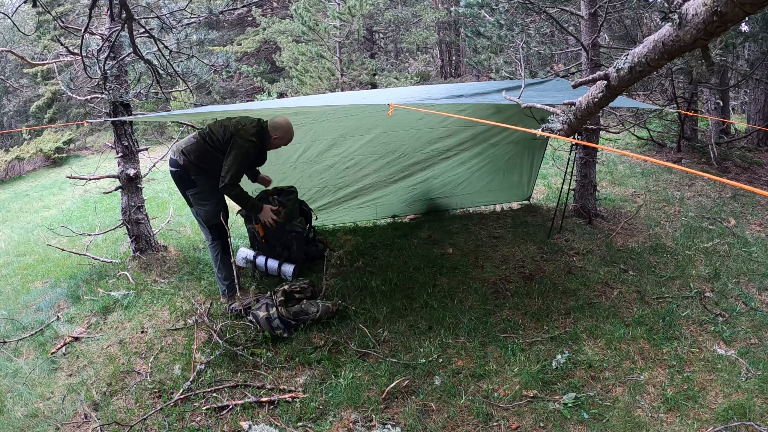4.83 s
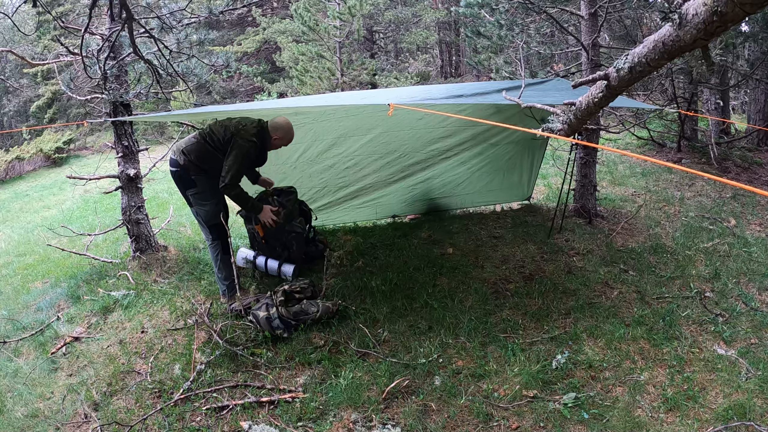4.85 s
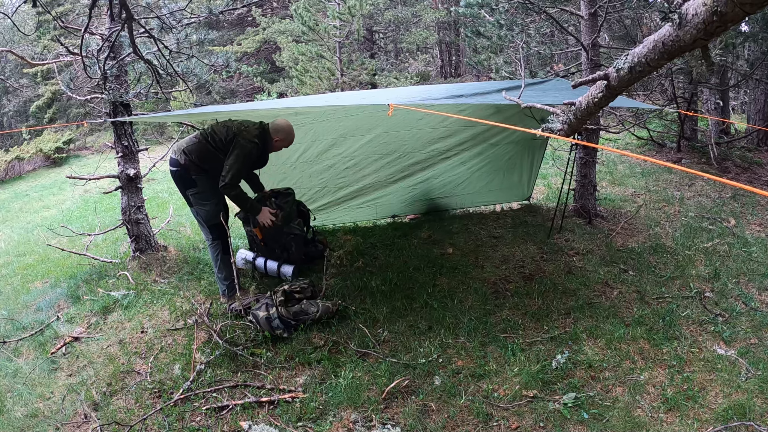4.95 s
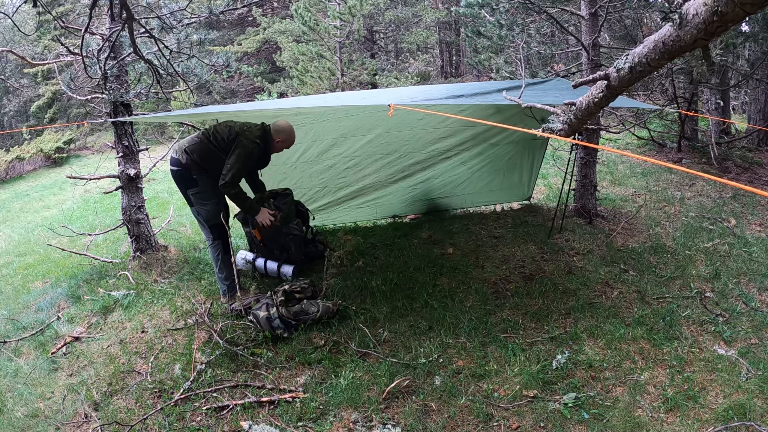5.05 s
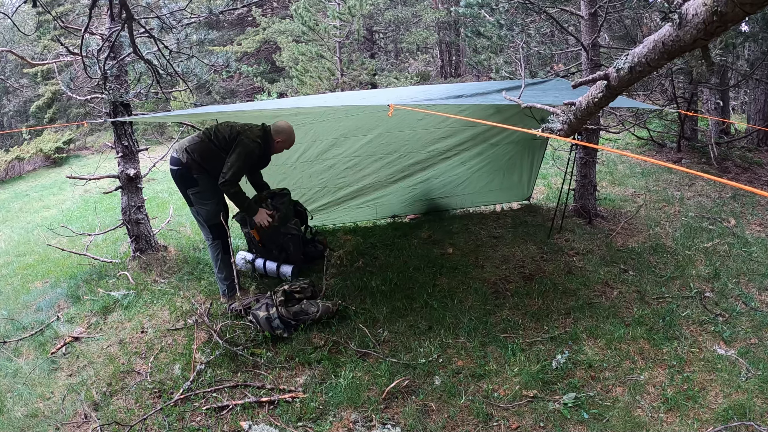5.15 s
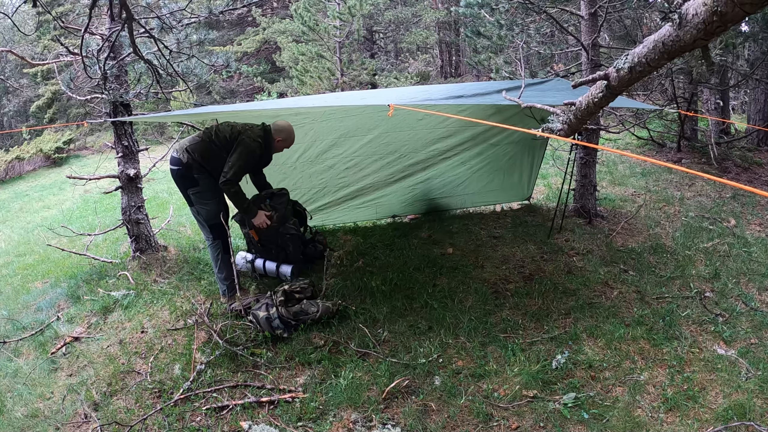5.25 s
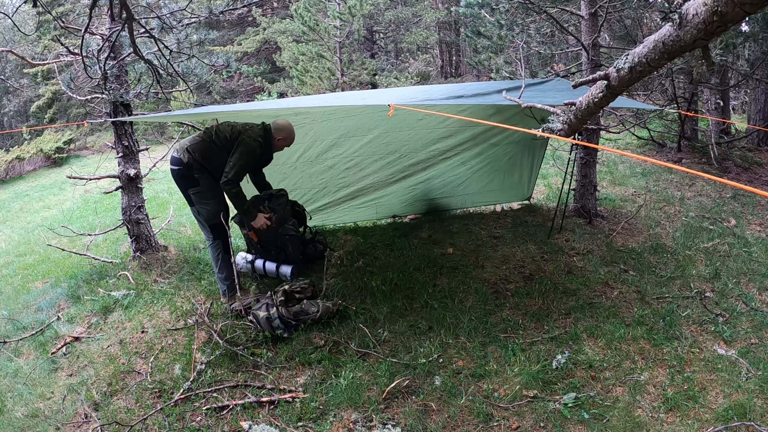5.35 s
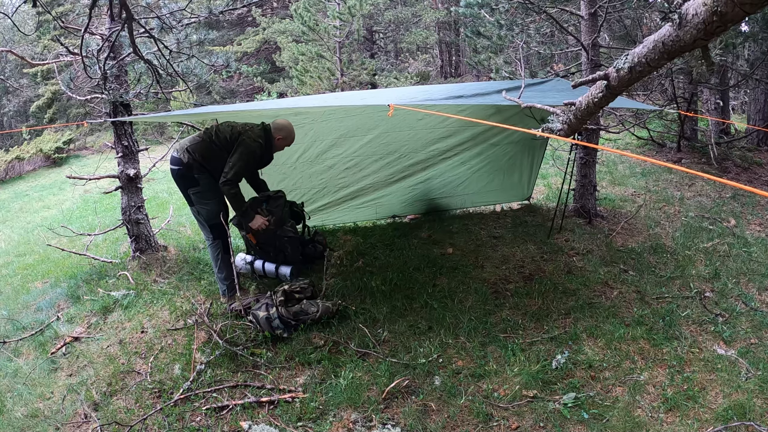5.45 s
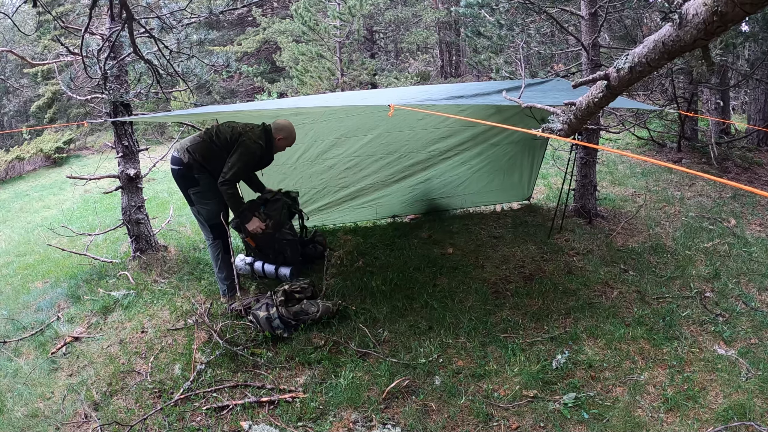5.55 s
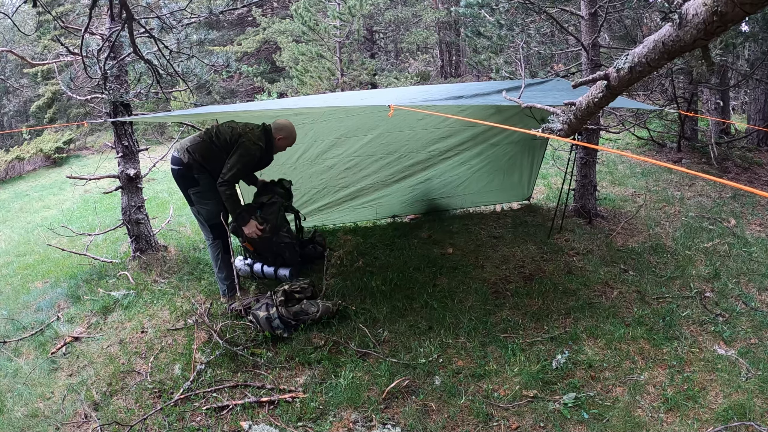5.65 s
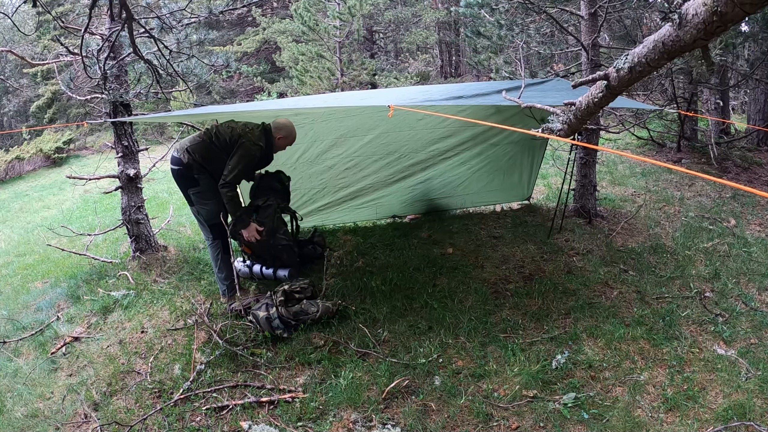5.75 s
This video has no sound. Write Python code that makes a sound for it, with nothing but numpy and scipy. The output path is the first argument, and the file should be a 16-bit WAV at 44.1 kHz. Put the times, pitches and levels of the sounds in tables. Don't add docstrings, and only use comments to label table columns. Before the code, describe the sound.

A hammer strikes a stake into soft forest ground about three times a second while a pack's nylon rustles and buckles tick close by.

```python
import sys
import numpy as np
from scipy import signal
from scipy.fft import rfft, irfft
from scipy.io import wavfile
from scipy.ndimage import uniform_filter1d

SR = 44100
rng = np.random.default_rng(int(sys.argv[2]) if len(sys.argv) > 2 else 0)


def boost(x):
    u = np.asarray(x, float) / 20
    return 10 ** u


def unload_audio(sound):
    columns = np.transpose(np.atleast_2d(sound))
    steps = np.round(np.clip(columns, -1, 1) * 32767)
    wavfile.write(sys.argv[1], SR, steps.astype(np.int16))


N = 255780

# t/s, peak level/dB, strongest ring f/Hz, bending ring f/Hz, squareness of the landing/0-1
BLOW_TABLE = [(0.7975, -11, 3930, 1370, 0.78), (1.1323, -8.5, 3840, 1870, .05),
              (1.4514, -8, 3880, 1780, 0.95), (1.795, -7, 4720, 1440, 0.96),
              (2.145, -9.5, 3740, 1425, 0.91), (2.4925, -6, 4040, 1490, 0.92),
              (2.843, -3, 5070, 1540, 0.27), (3.3154, -6, 3790, 1260, 0.84), (3.7104, -4, 4260, 1870, 0.85),
              (4.0869, -5.5, 3900, 1690, 0.9), (4.4482, -7, 3860, 1390, 0.98),
              (4.8072, -4.5, 3650, 1820, 1), (5.171, -5, 4110, 1530, 0.17), (5.5301, -7, 4050, 1780, .2)]
# chatter length/ms, middle ring f/Hz, bright rings level/dB, thump level/dB, scatter level/dB
LANDING_TABLE = [(7.5, 2580, -48, -43.5, -9.5), (2.1, 2760, -24, -36, -7.5), (6, 3030, -26, -40, -5),
                 (2.1, 2870, -31, -39, -4.5), (5.4, 2800, -71, -38, -5), (4.5, 2900, -24, -33.5, -4),
                 (1.2, 3400, -22, -33.5, -4.5), (5.3, 2430, -20, -29, -5), (2.8, 2540, -9.5, -31, -4.5),
                 (1.8, 2830, -20, -29, -8), (4.4, 2820, -23, -25.5, -7), (2.8, 2790, -17, -29, -3.5),
                 (2.5, 2170, -15.5, -31.5, -8.5), (7.1, 3000, -19, -34.5, -5.5)]


def evened(x):
    return x / np.sqrt(np.mean(x ** 2) + 1e-20)


def peaked(x):
    return x / (abs(x).max() + 1e-12)


def read(points, hz):
    f, value = np.transpose(points)
    return np.interp(np.log(hz + 1), np.log(f + 1), value)


def add(mix, s, sound):
    part = mix[round(s * SR):][:len(sound)]
    part += sound[:len(part)]


def span(s):
    return s[0] + np.arange(int((s[-1] - s[0]) * SR)) / SR


def resonate(x, hz, width):
    turn = np.exp(2j * np.pi * np.cumsum(hz * np.ones(len(x))) / SR)
    r = np.exp(-np.pi * width / SR)
    return 2 * (turn * signal.lfilter([1 - r], [1, -r], x / turn)).real


def ring(x, hz, width):
    return resonate(resonate(x, hz, width), hz, width)


def swells(rows, t):
    return sum(db * np.exp(-((t - middle) / half) ** 2) for middle, half, db in rows)


def field_axes():
    return np.fft.rfftfreq(512, 1 / SR), np.arange(N // 128 + 5) * 128 / SR


def pair(shape_db, same):
    a, b, c, d = rng.standard_normal((shape_db.shape[1], shape_db.shape[0], 4)).T
    left = a + 1j * b
    right = same * left + np.sqrt(1 - same ** 2) * (c + 1j * d)
    z = np.array([left, right]) * boost(shape_db)
    return signal.istft(z, nperseg=512, noverlap=384)[1][:, :N]


def handling(t):
    # t/s, rustle level/dB
    hands = [(0.0, -47), (0.05, -45), (0.14, -48.5), (0.48, -53.5), (0.68, -54.5), (0.9, -54), (1.0, -51),
             (1.21, -56), (2.03, -56.5), (2.63, -56), (2.73, -53.5), (3.58, -55), (3.81, -57.5),
             (4.13, -55), (4.31, -55.5), (4.59, -56), (5.32, -54), (5.8, -51.5)]
    s, busy_db = np.transpose(hands)
    return np.interp(t, s, busy_db - np.median(busy_db))


def cloth():
    # f/Hz, level per Hz/dB
    air = [(15, -38), (25, 2), (97, -12), (131, -18), (172, -6), (258, -15), (295, -11), (481, -14),
           (582, -18), (898, -19), (1180, -12), (2380, -11.5), (6870, -20.5), (13200, -47), (16400, -61)]
    # f/Hz, width/Hz, level/dB
    pack = [(70, 17, -2), (134, 54, 6.5), (243, 17, 6), (1100, 750, 6.5)]
    # f/Hz, likeness/0-1
    likeness = [(60, 1), (180, 0.87), (550, 0.93), (1650, 0.94), (4970, 0.98), (15000, 0.32)]
    follow = [.3, .7, 1.05, 1.1]
    # middle t/s, half length/s, lift/dB
    drags = [
        (.1, 0.059, 7),
        (0.705, 0.069, 10.5),
        (3.55, 0.36, 3.5),
        (4.313, 0.13, 4),
        (4.88, 0.06, 9),
    ]
    # middle t/s, half length/s, lift/dB
    brushes = [
        (.12, 0.043, 2.5),
        (.4, 0.051, 3.5),
        (3.09, 0.034, 2.5),
        (4.37, 0.062, 7),
        (5.05, .05, 3),
    ]
    hz, t = field_axes()
    moves = np.outer(follow, handling(t))
    moves[1] += swells(drags, t)
    moves[3] += swells(brushes, t)
    centres = np.log([40, 250, 1400, 5000])
    weights = np.array([np.interp(np.log(hz + 1), centres, row) for row in np.eye(4)])
    weights[-1] *= 1 + .45 * hz / 12000
    patches = uniform_filter1d(rng.standard_normal((len(t), len(hz))), 12, 0)
    patches = evened(uniform_filter1d(patches, 6, 1)).T
    crinkle = np.minimum(rng.exponential(1, len(t)), 5) - 1
    field_db = weights.T @ moves + 1.7 * patches + 1.3 * crinkle
    same = np.clip(read(likeness, hz) - .04, -1, 1)[:, None]
    fine_hz = np.fft.rfftfreq(N, 1 / SR)
    hollow_db = sum(db / (1 + (2 * (fine_hz - f) / width) ** 2) for f, width, db in pack)
    noise = irfft(rfft(pair(field_db, same)) * boost(read(air, fine_hz) + hollow_db), N)
    return boost(-51.5) * noise / np.median(abs(noise)) * 0.61


def slides():
    slide_table = [
        (0.13, 0.12, -50, 230),
        (3.557, 0.13, -54, 287),
    ]
    t, noise = np.arange(N) / SR, rng.standard_normal(N)
    out = np.zeros(N)
    for middle, half, db, hz in slide_table:
        out += boost(db) * np.exp(-((t - middle) / half) ** 2) * evened(ring(noise, hz, 140))
    return out


def crinkles():
    # t/s, peak level/dB
    creases = [(0.011, -40.5), (.213, -45), (.41, -71), (1.0408, -54), (1.0996, -45), (1.1804, -42),
               (1.278, -47), (1.306, -56), (1.3557, -50), (1.6662, -52.5), (2.7674, -43), (3.0862, -50),
               (3.668, -38.5), (3.909, -44.5), (3.918, -52), (3.928, -52), (4.624, -50), (4.7338, -55),
               (4.78, -55), (4.8753, -45), (5.0103, -57), (5.252, -42), (5.4338, -45.5), (5.618, -39.5)]
    per_s, floor_db, spread_db = 30, -57, 3
    busy = boost(handling(np.arange(N) / SR))
    size = boost(floor_db + spread_db * np.minimum(rng.exponential(1, N), 2)) * busy
    train = size * (rng.random(N) < per_s * busy / SR)
    for s, db in creases:
        add(train, s, boost(np.array([db + 8])))
    decay = np.exp(-np.arange(300) * 1e3 / SR / 2.08)
    burst = signal.oaconvolve(train, decay)[:N] * rng.standard_normal(N)
    snaps = ring(burst, 2800, 5100) + 0.16 * ring(burst, 6900, 4000)
    return signal.sosfilt(signal.butter(3, 7500, fs=SR, output="sos"), snaps)


def groan():
    # t/s, level/dB, upper groan f/Hz
    groan_curve = [(4.311, -56, 425), (4.335, -54, 367), (4.355, -46, 390), (4.375, -55, 450),
                   (4.39, -48, 330), (4.41, -47, 463), (4.432, -54, 450)]
    s, db, hz = np.transpose(groan_curve)
    t = span(s)
    noise = rng.standard_normal(len(t))
    judder = evened(resonate(noise, np.interp(t, s, hz), 110)) + 1.35 * evened(resonate(noise, 172, 110))
    out = np.zeros(N)
    add(out, s[0], boost(np.interp(t, s, db)) * judder)
    return out


def webbing():
    # t/s, upper whistle f/Hz, level/dB
    whistle_curve = [(0.95, 2180, -70.5), (0.966, 2007, -56), (0.996, 2250, -56), (1.018, 2140, -55),
                     (1.127, 2230, -52)]
    s, hz, db = np.transpose(whistle_curve)
    t = span(s)
    noise = rng.standard_normal(len(t))
    lower_hz = np.interp(t, s[[0, -1]], [1050, 870])
    whistle = evened(resonate(noise, np.interp(t, s, hz), 110))
    whistle += boost(-1) * evened(resonate(noise, lower_hz, 150))
    out = np.zeros(N)
    add(out, s[0], boost(np.interp(t, s, db)) * whistle * signal.windows.tukey(len(t), .2))
    return out


def squeaks():
    # t/s, slip rate f/Hz, level/dB
    slips = [
        [(4.215, 350, -62), (4.237, 400, -54), (4.252, 520, -48), (4.264, 620, -52), (4.275, 640, -64),
         (4.29, 610, -55), (4.305, 580, -62)],
        [(4.308, 740, -58), (4.33, 900, -50), (4.348, 1000, -50), (4.36, 1230, -40), (4.371, 1160, -45),
         (4.383, 1260, -40), (4.395, 1080, -42), (4.405, 880, -42), (4.412, 860, -55)],
    ]
    out = np.zeros(N)
    for rows in slips:
        s, hz, db = np.transpose(rows)
        t = span(s)
        waver = evened(uniform_filter1d(rng.standard_normal(len(t)), 120))
        turns = 2 * np.pi * np.cumsum(np.interp(t, s, hz) * (1 + 0.028 * waver)) / SR
        tone = np.sin(turns) + 0.43 * np.sin(2 * turns + 1.3 * waver)
        tone = np.sqrt(2) * tone * (1 + 0.21 * waver)
        add(out, s[0], boost(np.interp(t, s, db)) * tone * signal.windows.tukey(len(t), .15))
    return out


def tick(db, hz, noise, ms, width, rise):
    age = np.arange(len(noise)) * 1e3 / SR / ms
    snap = noise * np.minimum(age / rise, 1) * np.exp(-age)
    return boost(db) * peaked(resonate(snap, hz, width) + 0.025 * ring(snap, 1.22 * hz, 2800))


def ticks():
    # t/s, peak level/dB, ring f/Hz
    tick_table = [(0.053, -24.5, 1100), (0.101, -24.5, 3950), (0.133, -29, 1270), (0.211, -37, 1480),
                  (0.262, -36, 2310), (0.94, -34, 1080), (1.198, -37, 3580), (3.068, -46, 2930),
                  (3.462, -34.5, 2170), (3.667, -35, 2450), (4.114, -36, 1700), (4.181, -38, 1450),
                  (4.405, -26, 1320), (4.991, -35, 1130), (5.251, -31, 4080), (5.594, -42, 2840),
                  (5.617, -45, 2300)]
    out = np.zeros(N)
    for s, db, hz in tick_table:
        add(out, s, tick(db, hz, rng.standard_normal(800), 3.84, 270, rise=0.13))
    return out


def woods():
    # f/Hz, level per Hz/dB
    scatter = [(290, -16), (500, -16), (708, -50), (761, -26), (1360, -10.5), (1550, -12), (2770, -3),
               (5090, -1.5), (8090, -9.5), (16000, -42.5)]
    hz, t = field_axes()
    s = np.transpose(BLOW_TABLE)[0][:, None]
    echo = boost(np.transpose(LANDING_TABLE)[-1][:, None])
    age = np.maximum(t - s - .008, 0)
    near = (echo * (age > 0) * np.exp(-age / 0.0077)).sum(0)
    far = (echo * np.minimum(age / 0.0063, 1) * np.exp(-age / 0.06)).sum(0)
    gusts = boost(2 * evened(uniform_filter1d(rng.standard_normal(len(t)), size=2)))
    cloud = boost(-39.5) * near + boost(-50.5) * far * gusts
    return pair(read(scatter, hz)[:, None] + 20 * np.log10(cloud + 1e-9), 0.33)


def thump(db, hz, heave_db, noise):
    # f/Hz, width/Hz, level/dB
    soil = [(158.6, 16.8, -3), (330, 47, -48), (450, 21.7, -15)]
    ms = np.maximum(np.arange(len(noise)) * 1e3 / SR - 2.5, 0)
    push = np.exp(-((ms - 1.9) / 1.09) ** 2)
    push += 0.45 * noise * np.minimum(ms / 15, 1) * np.exp(-(ms / 50) ** 2)
    modes = soil + [(hz, 28, 5)]
    wobble = sum(boost(level) * resonate(push, f, width) / width for f, width, level in modes)
    wobble = signal.sosfilt(signal.butter(2, 130, "high", fs=SR, output="sos"), wobble)
    heave = ring(noise * ms * np.exp(-ms / 15), 72, 55)
    return boost(db + 1) * (peaked(wobble) + boost(heave_db - 10) * peaked(heave))


def earth():
    # t/s, thump level/dB, wobble f/Hz
    bumps = [(0.057, -43, 235), (0.107, -44, 169), (0.199, -45, 278), (0.266, -45.5, 173),
             (0.319, -44.5, 172), (0.444, -41.5, 199), (0.86, -59, 155), (3.085, -49, 90),
             (3.474, -46, 280), (3.539, -47, 285), (3.649, -45, 99), (3.98, -53, 90)]
    thumps = [(blow[0], landing[-2], 213.6, -4) for blow, landing in zip(BLOW_TABLE, LANDING_TABLE)]
    thumps += [(*bump, -11) for bump in bumps]
    out = np.zeros(N)
    for s, db, hz, heave_db in thumps:
        add(out, s, thump(db, hz, heave_db, rng.standard_normal(8000)))
    return out


def crack(blow, landing, noise):
    # f/Hz, width/Hz, level/dB
    stake = [(1720, 250, -5.5), (2950, 150, -2), (4200, 1980, -7.5), (6056, 290, -8.5), (6880, 300, 8),
             (8950, 110, 6), (10100, 77, -69), (10800, 330, -52)]
    s, db, hz, bend_hz, square = blow
    chatter_ms, middle_hz, bright_db = landing[:3]
    bend_db = -26 + (-11.5 + 26) * square
    middle_db = -61.5 + (-6.5 + 61.5) * square
    ms = np.arange(len(noise)) * 1e3 / SR - .9
    lumps = boost(2.4 * evened(uniform_filter1d(noise[::-1], 90)))
    chatter = np.exp(-(abs(ms) / chatter_ms) ** 3) + 0.34 * lumps * np.exp(-(ms / 9.8) ** 2)
    onset = np.clip(ms + .9, 0, 1) ** 2
    contact = 3.45 * np.exp(-(ms / 0.03) ** 2)
    drive = onset * chatter * noise - contact
    main = ring(drive, hz, 470) + sum(boost(level) * ring(drive, f, 1.99 * width) for f, width, level in stake[2:4])
    bright = sum(boost(level) * ring(drive, f, 3.4 * width) for f, width, level in stake[3:])
    middle = ring(drive * np.exp(-ms / 5.2), middle_hz, 600)
    bend = ring(drive * np.exp(-ms / 4.1), bend_hz, 350) + 0.39 * ring(drive * np.exp(-ms / 1.36), 1520, 1600)
    out = boost(db) * peaked(main) + boost(bright_db - 4.5) * peaked(bright)
    return out + boost(middle_db - 7.5) * peaked(middle) + boost(db + bend_db + 3.5) * peaked(bend)


def hammer():
    # t/s, peak level/dB, ring f/Hz
    rebounds = [(0.8087, -28, 4020), (1.14, -21, 1810), (1.459, -11, 4100), (1.4915, -33.5, 1950),
                (1.8067, -19.5, 3100), (2.1554, -35, 3800), (2.159, -18.5, 4040), (2.8497, -15, 4000),
                (2.857, -32, 4590), (2.875, -30, 3930), (3.322, -17, 3800), (3.7246, -20.5, 3800),
                (4.093, -11.5, 3900), (4.812, -40, 4060), (4.8235, -19, 3720), (4.843, -28, 4030),
                (5.5388, -31, 3800), (5.549, -20, 3940), (5.5516, -24, 4200)]
    out = np.zeros(N)
    for blow, landing in zip(BLOW_TABLE, LANDING_TABLE):
        add(out, blow[0], crack(blow, landing, rng.standard_normal(3000)))
    for s, db, hz in rebounds:
        add(out, s, tick(db, hz, rng.standard_normal(800), 2.5, 630, rise=0.57))
    return out


def scene():
    # f/Hz, level/dB
    housing_curve = [(20, -2), (450, 4), (730, -18), (1100, -2), (1750, -1.5), (2120, -5.5), (2500, -1),
                     (7000, -3.5), (8500, -4.5), (10000, -10), (13000, -16), (16000, -26), (18000, -72)]
    hz = np.linspace(0, SR / 2, 513)
    housing = signal.minimum_phase(signal.firwin2(1023, hz, boost(2 * read(housing_curve, hz)), fs=SR))
    snaps = signal.oaconvolve(hammer() + ticks(), housing)[:N]
    snaps = signal.sosfilt(signal.butter(3, 450, "high", fs=SR, output="sos"), snaps)
    straps = squeaks() + webbing() + groan()
    straps = signal.sosfilt(signal.butter(4, 6000, fs=SR, output="sos"), straps)
    return cloth() + slides() + crinkles() + straps + woods() + earth() + snaps


def roll_off(x):
    return signal.sosfilt(signal.butter(12, 16520, fs=SR, output="sos"), x)


def record(dry):
    # f/Hz, level/dB
    lean = [(30, .7), (150, -.2), (600, -1.), (1400, -.4), (2800, .7), (5000, -.4), (7000, -2.5),
            (9500, -6.), (15000, -5.)]
    # f/Hz, phase/rad
    lead = [(30, 0.3), (120, -0.051), (500, -0.3), (1500, -0.38), (3200, -0.79), (5000, -0.95),
            (7000, -1.58), (9000, -1.36), (12000, -0.87), (16000, -1.1)]
    hz = np.fft.rfftfreq(N, 1 / SR)
    side = np.array([[.5], [-.5]])
    ports = boost(side * read(lean, hz)) * np.exp(1j * side * read(lead, hz))
    ceiling = .75
    held = ceiling * np.tanh(irfft(rfft(dry) * ports, N) / ceiling)
    band_limit = signal.firwin(255, 16100, window=("kaiser", 8), fs=SR)
    held = signal.oaconvolve(held, band_limit[None], "same")
    return roll_off(held)


dry = scene()
out = record(dry)
unload_audio(out)
```